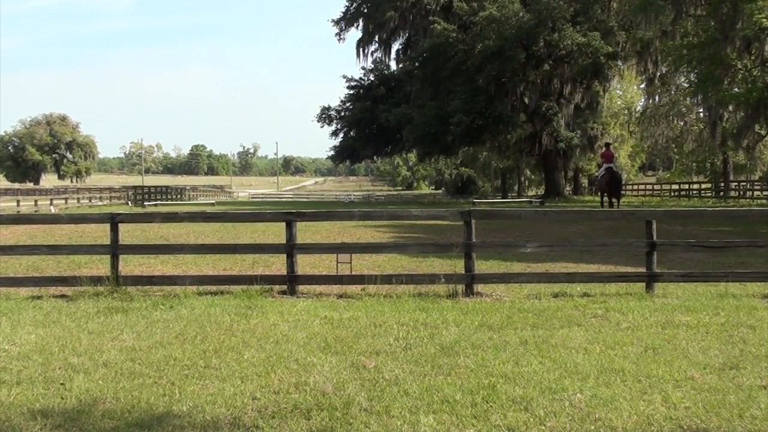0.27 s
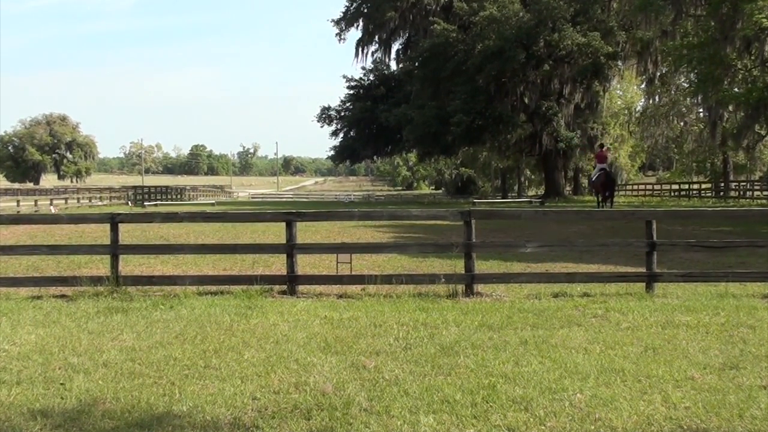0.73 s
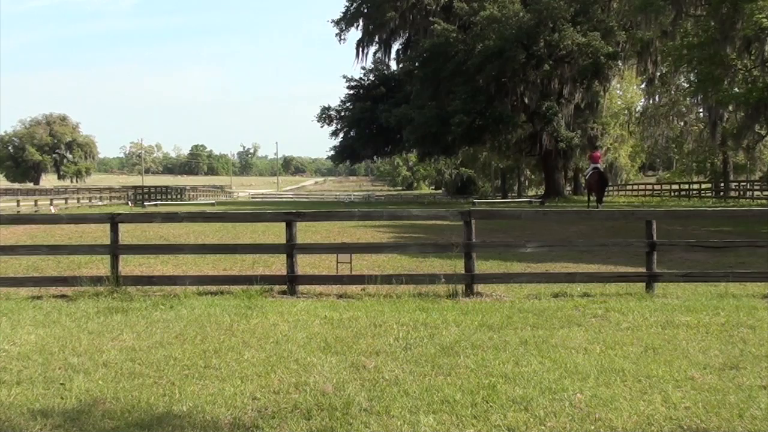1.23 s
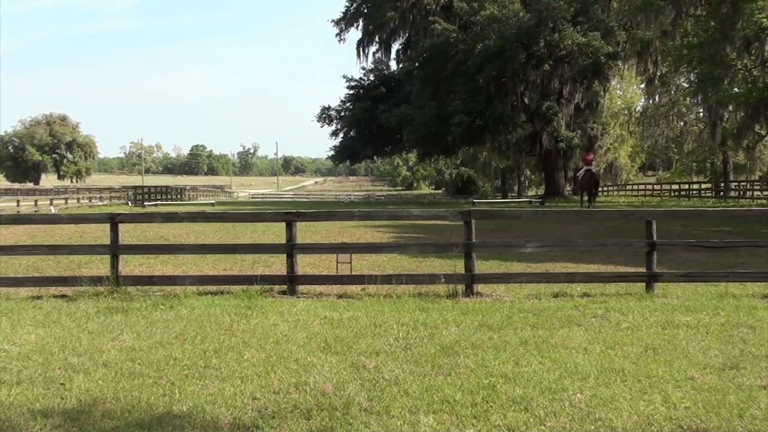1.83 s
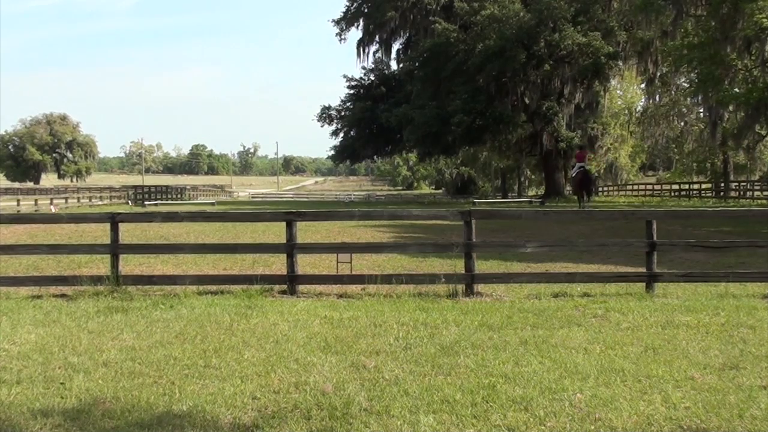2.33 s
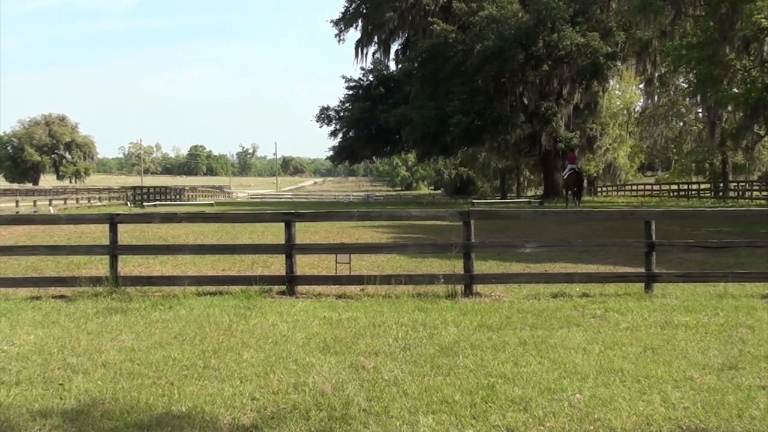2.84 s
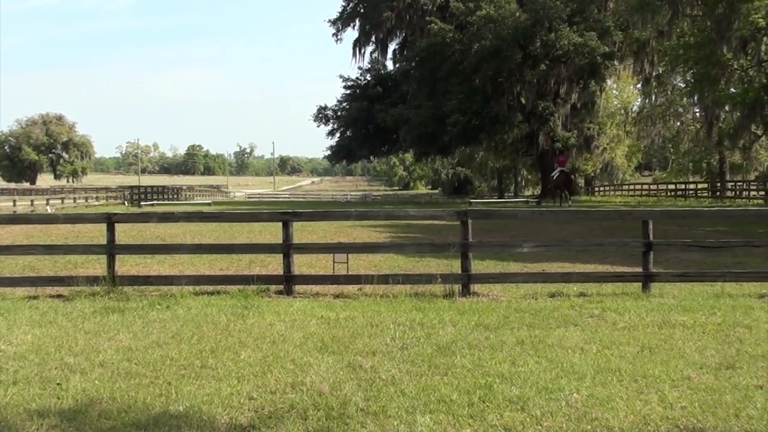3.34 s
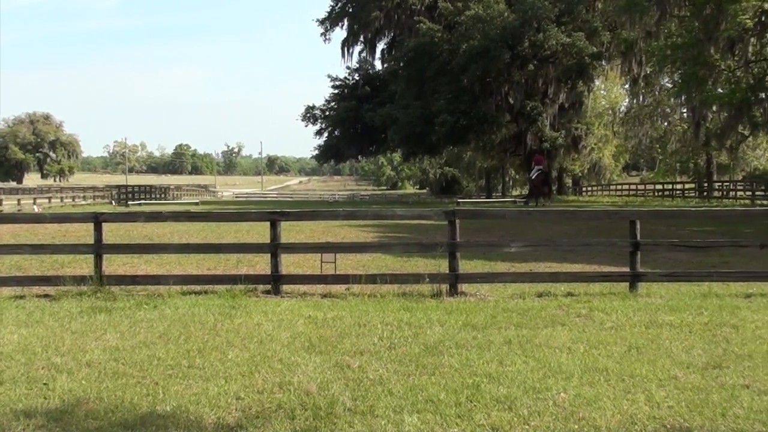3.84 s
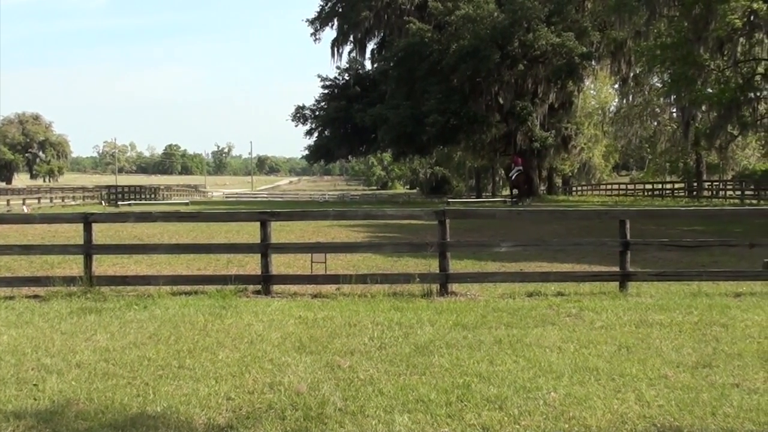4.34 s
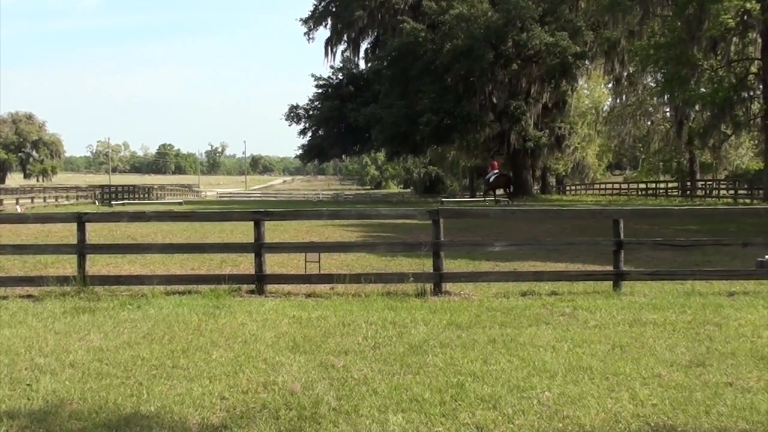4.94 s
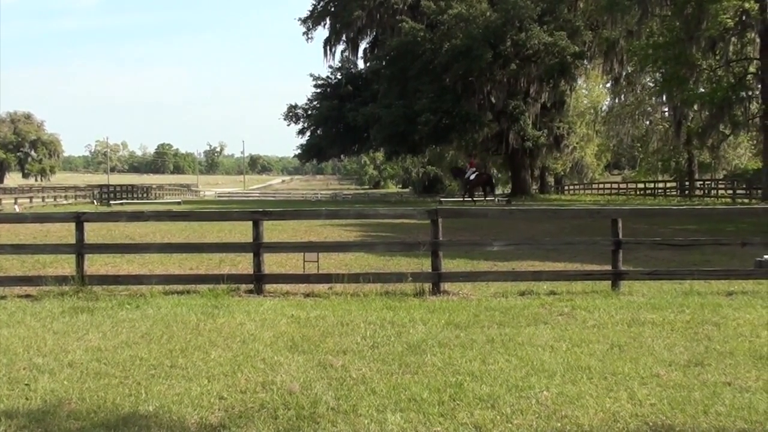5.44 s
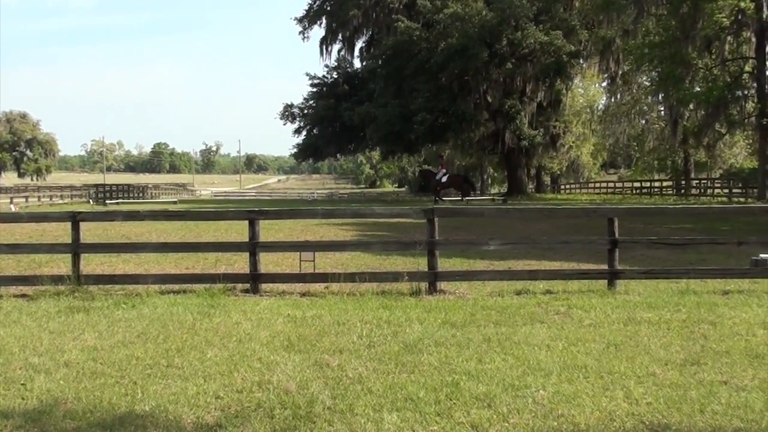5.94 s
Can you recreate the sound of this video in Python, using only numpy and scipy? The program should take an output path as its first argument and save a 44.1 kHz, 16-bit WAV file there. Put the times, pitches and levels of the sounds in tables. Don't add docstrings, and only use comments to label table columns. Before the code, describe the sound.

Crickets trill and chirp in a steady high chorus over a faint road drone, with a few distant wooden knocks echoing and dry ticks nearby.

```python
import sys
import numpy as np
from scipy import signal
from scipy.fft import rfft, irfft
from scipy.io import wavfile
from scipy.ndimage import uniform_filter1d, map_coordinates

SR = 44100
rng = np.random.default_rng(int(sys.argv[2]) if len(sys.argv) > 2 else 0)


def wav_record(signal):
    frames = np.transpose(np.atleast_2d(signal))
    bounded = np.clip(frames, -1, 1)
    quanta = np.round(bounded * 32767).astype(np.int16)
    wavfile.write(sys.argv[1], SR, quanta)


def gain_from_db(level_db):
    decades = np.asarray(level_db, float) / 20
    return 10 ** decades


N = 272979

# time from mid stroke in ms, share of the singer's pitch, level in dB.
FALL = [(-5.8, 1.058, -30), (-4.4, 1.054, -2), (-2, 1.033, 0), (0, 1, -1), (2, .961, -2), (4, .93, -5),
        (6, .91, -30)]
# frequency in Hz, likeness 0 to 1.
ALIKE = [(30, .992), (60, .98), (130, .95), (290, .91), (640, .89), (1410, .75), (3100, .58), (6000, .75)]
# start in seconds, level in dB, brightness ratio, far answer in dB.
BLOWS = [
    (.608, -29.5, 0.96, 3.5),
    (2.28, -20, 0.93, -4),
    (6.157, -33, 0.69, 5),
]
TREES_S = .111


def unit(x):
    return x / np.sqrt(np.mean(x ** 2) + 1e-20)


def along(points, hz):
    f, v = np.transpose(points)
    return np.interp(np.log(hz + 1), np.log(f + 1), v)


def curves(rows):
    s, *cols = np.transpose(rows)
    return [np.interp(np.arange(N) / SR, s, c) for c in cols]


def wobble(rate):
    knots = rng.standard_normal(int(N * rate / SR) + 4)
    return map_coordinates(knots, [np.arange(N) * rate / SR])


def panned(x, pan_db):
    return np.array([x * gain_from_db(pan_db / 2), x * gain_from_db(-pan_db / 2)])


def rush(spectrum, alike, patchy_db):
    z = signal.stft(rng.standard_normal((2, N)), nperseg=512)[2]
    field = uniform_filter1d(rng.standard_normal(z.shape[1:]), size=6, axis=0)
    field = uniform_filter1d(field, size=14, axis=1)
    pair = signal.istft(z * gain_from_db(patchy_db * unit(field)), nperseg=512)[1][:, :N]
    hz = np.fft.rfftfreq(N, 1 / SR)
    turn = np.arccos(np.clip(along(alike, hz), -1, 1)) / 2
    mid, side = irfft(rfft(pair) * gain_from_db(along(spectrum, hz)) * [np.cos(turn), np.sin(turn)], N)
    return unit(np.array([mid + side, mid - side]))


def strokes(count, rate, shape, hz_scale):
    ms = 1000 * (count - np.round(count)) / rate
    at, hz, level_db = np.transpose(shape)
    flutter = 1 + .002 * wobble(40) + .0015 * wobble(400)
    pitch = hz_scale * np.interp(ms, at, hz) * flutter
    gain = gain_from_db(np.interp(ms, at, level_db, -90, -90) + 1.1 * wobble(250) + 1.1 * wobble(30))
    return gain * np.sqrt(2) * np.sin(2 * np.pi * np.cumsum(pitch) / SR)


def trill(table, lead, shape):
    rate, level_db = curves(table)
    return gain_from_db(level_db) * strokes(lead + np.cumsum(rate) / SR, rate, shape, 1)


def phrases(table, rate, hz, swell_db, swell_s):
    t = np.arange(N) / SR
    current = np.searchsorted(np.array(table)[:, 0] - .06, t) - 1
    start, end = np.transpose(table)[:, np.clip(current, 0, None)]
    count = (t - start) * rate
    middle = start + np.round(count) / rate
    swell = -swell_db * np.exp(-np.clip(middle - start + 0.055, 0, None) / swell_s)
    tire = -2 * np.exp(-np.abs(end + 0.025 - middle) / 0.024)
    singing = (middle < end + .02) * (middle > start - .03)
    return gain_from_db(swell + tire) * singing * strokes(count, rate, FALL, hz)


def trillers():
    # time from mid stroke in ms, pitch in Hz, level in dB.
    arch_high = [(-5.3, 8750, -30), (-3.9, 8880, -4), (-2, 9090, -.5), (.5, 9280, -1.5), (2, 9230, -2),
                 (3.4, 8900, -2), (5.6, 8220, -4), (7, 8000, -30)]
    arch_low = [(-4.6, 8400, -30), (-3.2, 8550, -2), (-1, 8820, 0), (1, 8950, 0), (2.6, 9010, -1),
                (4.8, 8830, -4), (6, 8600, -30)]
    # time in seconds, strokes a second, level in dB.
    trill_high = [(0, 64.94, -46.9), (1, 64.93, -46.8), (2, 64.86, -47), (2.9, 64.825, -47),
                  (6.19, 64.825, -47.2)]
    trill_low = [(0, 57.48, -55), (2, 57.485, -49.8), (4, 57.53, -47.3), (5.5, 57.69, -44.8),
                 (6.19, 57.68, -45.5)]
    high = gain_from_db(1.1) * panned(trill(trill_high, .168, arch_high), -0.42)
    low = gain_from_db(-0.4) * panned(trill(trill_low, .22, arch_low), -0.5)
    return high + low


def pausing_singers():
    # first stroke in seconds, end in seconds.
    quick = [(.1778, .493), (.7086, .973), (1.3803, 1.627), (1.9477, 2.177), (2.415, 2.714),
             (3.0609, 3.325), (3.5845, 3.883), (4.1434, 4.46), (4.7932, 5.074), (5.321, 5.637),
             (5.8476, 6.163)]
    middle = [(.0127, .24), (.6049, 1.057), (1.7946, 2.191), (2.4668, 2.864), (3.2042, 3.601),
              (3.9327, 4.292), (4.718, 5.077), (5.4364, 5.832)]
    deep = [(.0083, .269), (.8097, 1.263), (1.8678, 2.321), (2.7653, 3.325), (3.7006, 4.196), (4.6488, 5.4),
            (5.9551, 6.172)]
    shy = [(2.19, 2.42), (2.86, 3.07), (4.3, 4.5), (5.07, 5.33)]
    return (gain_from_db(-46.0) * panned(phrases(quick, 57.5, 7830, swell_db=9, swell_s=0.042), -3.67)
            + gain_from_db(-46.0) * panned(phrases(middle, 53.4, 7670, swell_db=13, swell_s=0.057), -1.9)
            + gain_from_db(-57.0) * panned(phrases(deep, 46.7, 6720, swell_db=3, swell_s=0.081), -.4)
            + gain_from_db(-51) * phrases(shy, 55.5, 7750, swell_db=4, swell_s=.05))


def distant_singers():
    # strokes a second, pitch in Hz, level in dB.
    distant = [
        (55.3, 8400, -54.5),
        (60.7, 7600, -55),
        (50.2, 7150, -58),
    ]
    out = 0
    for rate, hz, db in distant:
        count = rate * np.arange(N) / SR + .2 * wobble(1.5)
        out = out + gain_from_db(db + 2.6 * wobble(2.54)) * strokes(count, rate, FALL, hz)
    return out


def grass_blur(near):
    t = np.arange(SR // 10) / SR
    scatter = rng.standard_normal((2, len(t))) * gain_from_db(-60 * t / .06)
    scatter = scatter[0] + 0.3 * scatter[1] * np.array([[1], [-1]])
    scatter = scatter / np.linalg.norm(scatter[0])
    return gain_from_db(-17) * signal.fftconvolve(near, scatter, axes=1)[:, :N]


def far_chorus():
    # frequency in Hz, level in dB per Hz.
    chorus = [(5200, -44), (6000, -15), (6800, -3.5), (7800, -1.5), (8800, -1.5), (9400, -7), (10200, -3.5),
              (10600, -38)]
    return gain_from_db(-55.5 + 1.2 * wobble(3.1)) * rush(chorus, [(8000, 0.85)], patchy_db=1.5)


def crickets():
    near = trillers() + pausing_singers() + distant_singers()
    return near + grass_blur(near) + far_chorus()


def passing(steady_db, rows):
    t = np.arange(N) / SR
    power = gain_from_db(2 * steady_db)
    for s, half_s, db in rows:
        power = power + gain_from_db(2 * db) / (1 + ((t - s) / half_s) ** 2)
    return np.sqrt(power)


def road():
    # closest in seconds, half width in seconds, tyre level in dB, engine level in dB.
    passes = [
        (1.7, 1, -50.5, -54.5),
        (5.7, 1.24, -48.5, -47),
    ]
    # middle in seconds, half width in seconds, level in dB.
    surges = [
        (.15, 0.23, -52.5),
        (2.19, 0.12, -56),
    ]
    # frequency in Hz, level in dB per Hz.
    rumble = [(12, -60), (22, -24.5), (42, -6), (64, -1), (113, -.5), (190, -8), (390, -9), (660, -120)]
    drone = [ (120, -30.5), (200, -11.5), (453, -4), (488, -2), (930, -3), (1200, -11), (1560, -38),
             (2640, -120)]
    tyre_tone = [(590, -40), (1000, -2.5), (1290, -4.5), (1790, -6.5), (2200, -14.5), (3200, -24),
                 (4160, -54), (7040, -120)]
    engines = passing(-48.5, [(s, half, db) for s, half, _, db in passes])
    tyres = passing(-62, [(s, half, db) for s, half, db, _ in passes])
    out = passing(-53.5, surges) * gain_from_db(0.78 * wobble(3.74)) * rush(rumble, ALIKE, patchy_db=0.5)
    engines = engines * gain_from_db(0.22 * wobble(5.28)) * panned(0.96, -1.88)[:, None]
    out += engines * rush(drone, ALIKE, patchy_db=0.73)
    tyres = tyres * gain_from_db(0.28 * wobble(5.6)) * panned(1, -2.07)[:, None]
    return out + tyres * rush(tyre_tone, ALIKE, patchy_db=0.72)


def mains_hum():
    hz = 59.5 + 0.806 * wobble(3.6)
    return gain_from_db(-57.5 + 1.5 * wobble(4.5)) * np.sin(2 * np.pi * np.cumsum(hz) / SR)


def breeze():
    # frequency in Hz, level in dB per Hz.
    air = [(1500, -9), (2500, -1), (4000, -2.5), (5500, -5), (7000, -30)]
    return gain_from_db(-58.5 + 0.23 * wobble(2.5)) * rush(air, ALIKE, patchy_db=1.0)


def microphone_hiss():
    # frequency in Hz, level in dB per Hz.
    hiss = [(3000, -45.5), (6000, 4.5), (10400, 2), (10900, -1.5), (11500, 0), (15700, -0.7)]
    return gain_from_db(-56.0) * rush(hiss, [(5000, 0.27), (10000, 1.0)], patchy_db=1.5)


def grass():
    # middle in seconds, level in dB, length in seconds.
    rustles = [(0.543, -59, .046), (0.873, -58, 0.1), (1.134, -56, 0.062), (1.25, -50.5, 0.049),
               (1.35, -54, .012), (1.424, -48, 0.02), (1.506, -52, .006), (2.025, -48.5, .0057),
               (2.114, -55, 0.025), (2.476, -60, .008), (5.967, -55, .006)]
    # frequency in Hz, level in dB per Hz.
    stems = [(1200, -41), (2200, 4.5), (3800, -4), (6000, -1), (8000, -23)]
    t = np.arange(N) / SR
    puffs = sum(gain_from_db(db) * np.exp(-((t - s) / length) ** 2) for s, db, length in rustles)
    return puffs * gain_from_db(2.3 * wobble(300)) * rush(stems, [(3000, 0.97)], patchy_db=2.5)


def knocks():
    # start in seconds, peak in dB,
    # pitch in Hz, left over right in dB, overtones in dB.
    arrivals = [(.608, -13.5, 1020, -10, -1), (0.6148, -16.5, 1080, -4, -8), (.6228, -20.5, 890, -5, .5),
                (1.168, -23, 1600, 6, -5.5), (2.2824, -0.5, 1370, -9.5, -6),
                (2.2858, -11.5, 1134, -3, -0.5), (2.2904, -19, 1045, -2, 3.5), (2.298, -27, 1121, -6, 0),
                (2.3093, -24, 1010, -4, -5), (2.339, -25.5, 1226, -2.5, -4), (6.158, -18.5, 1038, -6, 1),
                (6.164, -23.5, 870, -2, -10)]
    overtones = [(1.65, 0.5), (2.4, 0.13), (3.3, 0.066), (4.7, 0.032)]
    trees = []
    for s, db, _, _ in BLOWS:
        trees.append((s + TREES_S, db + 1, 1461, -4, -8))
        trees.append((s + 2 * TREES_S, db + 1 - 14, 1461, -4, -8))
    out, t = np.zeros((2, N + SR)), np.arange(SR // 40) / SR
    for s, db, hz, pan_db, over_db in arrivals + trees:
        t60 = (23.3 - 1.2955 * abs(pan_db)) / hz
        upper = sum(share * np.sin(2 * np.pi * ratio * hz * t) for ratio, share in overtones)
        ring = np.sin(2 * np.pi * hz * t) + gain_from_db(over_db) * upper
        envelope = gain_from_db(db + 2.5 - 60 * t / t60) * (1 - np.exp(-t / 0.00045)) ** 2
        out[:, round(s * SR):][:, :len(t)] += panned(envelope * ring, pan_db)
    return out[:, :N]


def echo_trail():
    # frequency in Hz, level in dB per Hz.
    trail_tone = [(400, -70), (600, -10), (1100, -.5), (1700, -3), (2200, -4), (3200, -18.5), (4800, -27),
                  (6000, -57)]
    rise_s = 0.0064
    trail = 0
    for s, db, bright, far_db in BLOWS:
        u = np.clip(np.arange(N) / SR - s, 0, None)
        tone = [(hz * bright, v) for hz, v in trail_tone]
        rise = np.minimum(u / rise_s, 1)
        near = rise * gain_from_db(-3.5 - 60 * u / .22)
        far = rise * np.where(u < TREES_S - rise_s, 0.74, 1) * gain_from_db(-12.5 + far_db - 60 * u / 1.24)
        lean_db = -1.5 - 5 * np.exp(-u / 0.062)
        gain = np.hypot(near, far) * gain_from_db(db + 2.4 * wobble(150))
        trail = trail + panned(gain, lean_db) * rush(tone, [(1000, 0.94)], patchy_db=2.0)
    return trail


def ticks():
    # start in seconds, peak in dB, body in dB, left over right in dB.
    cracks = [
        (1.2897, -7.5, -24.5, 3.0),
        (3.2576, -39, -19, 1),
        (3.4929, -20.5, -21.5, 2),
    ]
    # frequency in Hz, level in dB, t60 in seconds, delay in seconds.
    shell = [(786, -6, 0.0057, 0.00032), (1940, -2, 0.0054, 0), (3300, 0, 0.0021, 0.0022),
             (4980, 8.5, 0.002, 0), (7760, -1, 0.0017, 0.0018), (10000, -11, 0.0018, 0.0019)]
    out, t = np.zeros((2, N + SR)), np.arange(SR // 50) / SR
    for s, db, body_db, pan_db in cracks:
        ring = 0
        for hz, level, t60, delay in shell:
            u = np.clip(t - delay, 0, None)
            size_db = level + (body_db + 20.5) * (hz < 2500)
            envelope = gain_from_db(size_db - 60 * u / t60) * (1 - np.exp(-u / 0.00015)) ** 2
            ring = ring + envelope * np.sin(2 * np.pi * hz * u)
        for late_s, slip_db in [(.001, 0.5), (.0026, -10), (.0068, -17)]:
            slip = panned(gain_from_db(db + slip_db - 2) * ring, pan_db)
            out[:, round((s + late_s) * SR):][:, :len(t)] += slip
    return out[:, :N]


def bird():
    # start in seconds, end in seconds, first pitch in Hz, last pitch in Hz, level in dB.
    whistles = [
        (2.966, 3.112, 3400, 3330, -63),
        (6.055, 6.125, 3226, 3300, -62),
    ]
    t = np.arange(N) / SR
    song = 0
    for start, end, from_hz, to_hz, db in whistles:
        swell = np.sin(np.pi * np.clip((t - start) / (end - start), 0, 1)) ** .5
        hz = np.interp(t, [start, end], [from_hz, to_hz])
        song = song + gain_from_db(db) * swell * np.sin(2 * np.pi * np.cumsum(hz) / SR)
    return panned(song, -.5)


def scene():
    background = road() + mains_hum() + breeze()
    return crickets() + background + grass() + knocks() + echo_trail() + ticks() + bird()


def low_pass(x):
    return signal.sosfilt(signal.butter(12, 15730, fs=SR, output="sos"), x)


def record(dry):
    mix = dry + microphone_hiss()
    return low_pass(mix)


dry = scene()
out = record(dry)
wav_record(out)
```